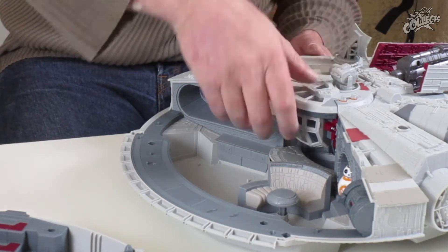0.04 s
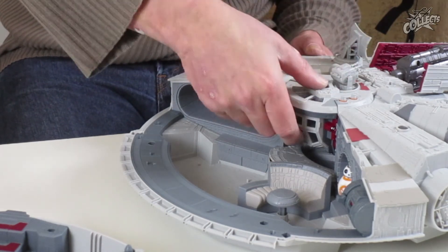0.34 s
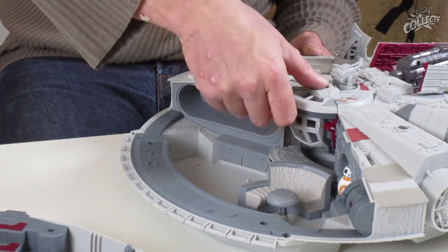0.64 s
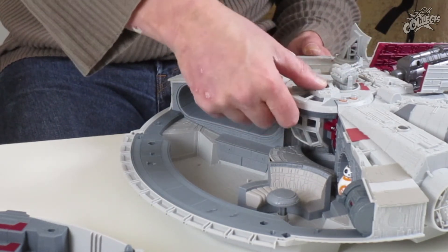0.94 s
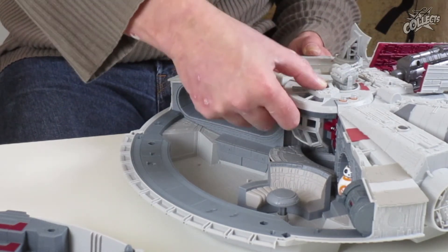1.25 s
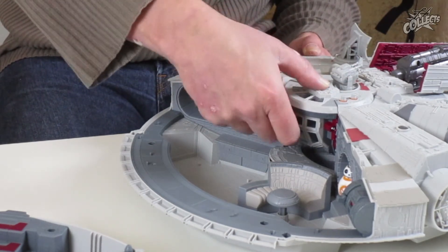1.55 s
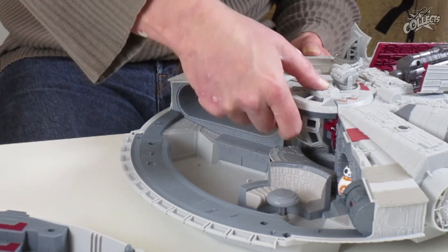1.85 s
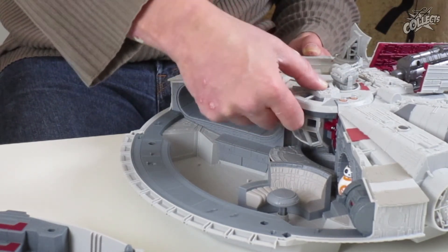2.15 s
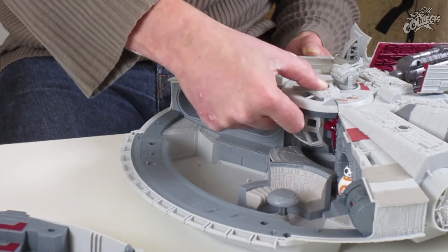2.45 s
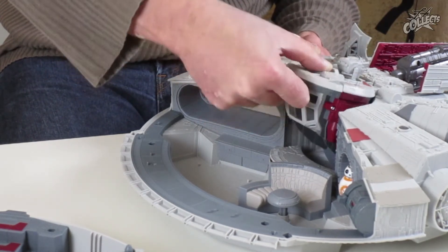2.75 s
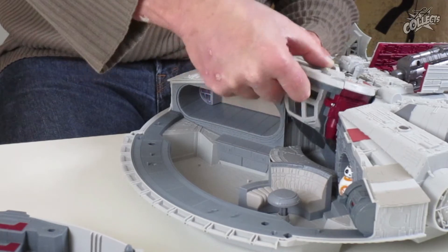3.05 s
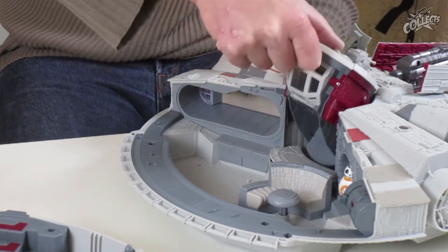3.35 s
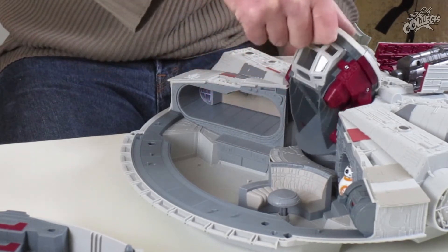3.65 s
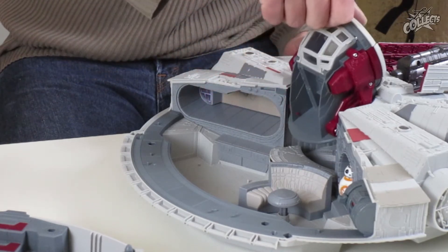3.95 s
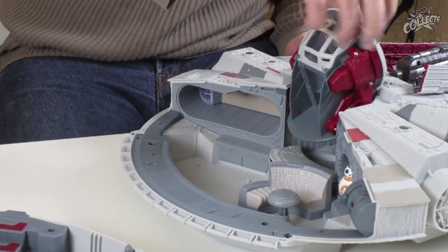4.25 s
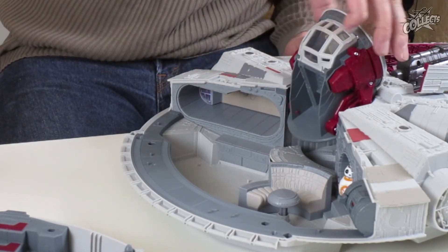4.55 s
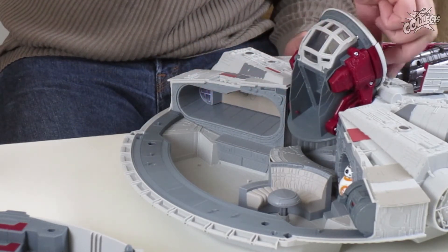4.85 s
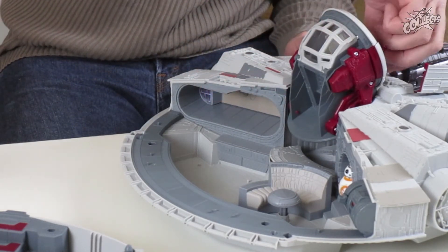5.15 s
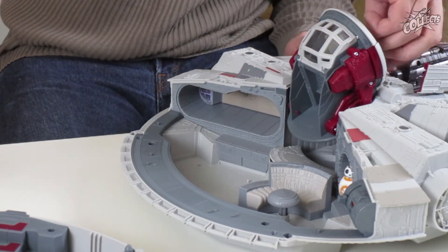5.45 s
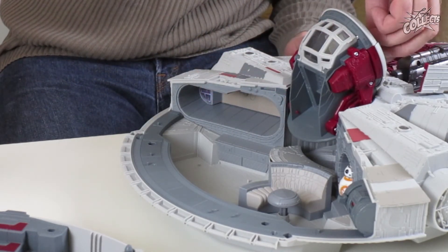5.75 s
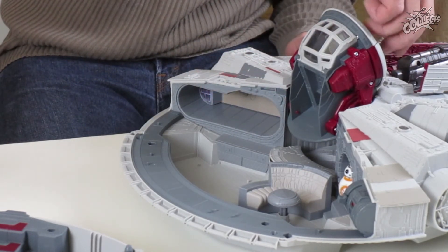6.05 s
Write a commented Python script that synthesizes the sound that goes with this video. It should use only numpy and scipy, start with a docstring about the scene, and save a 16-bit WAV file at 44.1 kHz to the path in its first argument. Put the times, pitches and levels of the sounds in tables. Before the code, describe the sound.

Fingers scuff and tap hollow plastic, then a switch snaps, a hatch knocks loose and small parts click into place.

```python
"""Handling a hollow plastic toy

A hand works a large hollow plastic toy on a table in a small, quiet room. Fingers rub and bump the
shell, a switch snaps, a hatch knocks free and swings up on a ticking hinge, and a small cannon clicks
into place. Blows chatter and ring the shell, panels give short tones, and rubs are showers of
tiny slips. A faint deep throb comes steadily about twice a second, over a low room rumble."""
import sys
import numpy as np
from scipy import signal
from scipy.fft import rfft, irfft
from scipy.io import wavfile
from scipy.ndimage import uniform_filter1d

SR = 44100
rng = np.random.default_rng(int(sys.argv[2]) if len(sys.argv) > 2 else 0)


def dump(signal):
    """Clip the signal to [-1, 1] and save it as 16-bit WAV at the path in sys.argv[1]."""
    limited = np.clip(np.atleast_2d(signal).T, -1, 1)
    pcm = np.round(limited * 32767).astype(np.int16)
    wavfile.write(sys.argv[1], SR, pcm)


N = 273463

# colour of the low room rumble: (f/Hz, level/dB)
RUMBLE_COLOUR = [(15, -1), (30, -3.5), (55, -9.5), (85, -6.5), (165, -13), (230, -23), (310, -28.5),
                 (500, -31.5), (900, -60)]
# colour of the faint hiss, filtered off above about 12 kHz: (f/Hz, level/dB)
HISS_COLOUR = [(100, -1.5), (400, 6.5), (700, 18), (1100, 11), (2000, 7), (4000, 1.5), (8000, -1.5),
               (11500, -3.5), (12800, -22.5), (16000, -24.5)]
# decay of the room's tail: (f/Hz, t60/s)
ROOM_T60 = [(100, 0.44), (300, 0.21), (1000, 0.18), (2000, 0.22), (5000, 0.11), (12000, 0.13)]
# early echoes off the table and near walls: (delay/s, level/dB)
ECHOES = [(.0032, -7.5), (.0085, -21), (0.0179, -8), (0.026, -14), (.033, -21)]
# short panel tones, alone or under knocks and snaps: (t/s, level/dB, f/Hz, rise/cycles)
PANEL_TONES = [(.108, -51.5, 576, 2.8), (.109, -50.5, 297, 1.22), (.402, -56, 600, 2.1),
               (.535, -57, 626, 5.5), (1.595, -59.5, 629, 6.4), (2.5198, -45, 725, 1.38),
               (2.653, -23.5, 526, 1.55), (2.897, -70, 810, 1.1), (3.127, -73, 752, 1.4),
               (3.243, -70, 802, 1.4), (3.872, -69.5, 861, 1.6), (4.238, -46.5, 255, 1.23),
               (4.24, -52, 550, 3.9), (4.2402, -47.5, 2210, 3.35), (4.838, -59.5, 938, 4.9),
               (5.126, -58.5, 833, 2.45), (5.211, -52.5, 900, 0.85), (5.215, -39.5, 1660, 1.2),
               (5.287, -52, 836, 2.5), (5.308, -58.5, 805, 2.4), (5.389, -60.5, 860, 1.13)]
# fingers and loose parts knocking on the shell:
# (t/s, level/dB, hardness/dB per octave, low cut/Hz, struck wall f/Hz, seating time/s)
KNOCKS = [(.111, -67, -6, 90, 1690, 0.007), (.17, -64.5, -4.5, 90, 950, .002),
          (.596, -49.5, -5, 330, 850, 0.00058), (.623, -49.5, -5, 180, 1770, 0.0015),
          (.657, -54, -6.5, 79.5, 340, 0.0014), (1.3641, -47.5, -3.5, 178, 750, 0.00082),
          (1.467, -58, -3.5, 70, 306, 0.00087), (1.525, -78, 3, 303, 656, .0007),
          (1.957, -47, 0, 330, 1530, 0.0004), (1.991, -52.5, -2.5, 199, 1580, 0.00061),
          (4.2254, -57, 3, 180, 550, 0.0036)]
# colour of one hard contact: (f/Hz, level/dB)
CONTACT_COLOUR = [(40, -32.5), (110, -9.5), (300, -8), (385, -14.5), (540, -1.5), (900, -11.5),
                  (1250, -12.5), (1700, -17), (2000, -26), (2400, -28), (3000, -35.5), (4700, -30),
                  (7000, -41), (8200, -50), (10500, -53), (16000, -77)]
# modes of the hollow shell: (f/Hz, level/dB, t60/s)
SHELL_MODES = [(95.8, -10.5, 0.744), (129.2, -3, 0.402), (139.46, -10, .3), (172, -13.5, 0.18),
               (209.7, -13, 0.37), (253.8, -9, 0.48), (324.2, 2.5, 0.15), (440, -7.5, 0.1433),
               (497.3, -5, 0.28), (526, -1, 0.31), (676, -5, 0.36), (760, 1.5, 0.13), (753, -15, 0.12),
               (856, -10.5, 0.2), (839, -19.5, 0.201), (1070, -4.5, 0.11), (1151.5, -20.5, 0.34),
               (1495, -22, .17), (1586, -12, 0.21), (1852, -29.5, 0.047), (2096, -17.5, 0.12),
               (2560, -18.5, 0.0515)]
# bands that shape a blow, from thud to sparkle: (low f/Hz, high f/Hz)
BLOW_BANDS = [(80, 300), (300, 1100), (1100, 2000), (2000, 3200), (3200, 8000), (8000, 15000)]
# peak balance of a blow of middling hardness: (level/dB for each band)
BLOW_BALANCE = [0.5, -2, -10.5, -21.5, -24, -38.5]
# small loose parts set ringing by the blows: (t/s, level/dB, f/Hz)
PINGS = [(.111, -58, 1720), (.112, -79.5, 4450), (.623, -84, 4360), (1.3641, -68, 4920),
         (1.89, -54.5, 6320), (1.8966, -67, 3950), (2.651, -60.5, 4362), (4.239, -60, 4530),
         (4.9176, -64.5, 4050), (4.938, -63.5, 4070), (5.2145, -61, 5170)]
# soft bumps of toy and table: (t/s, level/dB, f/Hz, swell and decay/s)
BUMPS = [(0.292, -47.5, 54.6, 0.046), (0.608, -46, 121.6, 0.017), (1.752, -38.5, 63.7, 0.035),
         (4.226, -44, 59, 0.021), (5.341, -44.5, 59.3, 0.019)]
# skin and plastic sliding on the shell: (peak t/s, level/dB, swell/s, release/s, panel drone/dB)
RUBS = [(.42, -76.5, .012, 0.042, 11), (.55, -61.5, 0.028, 0.022, -7), (.612, -50.5, 0.029, 0.042, -12),
        (.655, -56, 0.022, 0.0068, -4), (1.36, -51, .016, .016, -15), (1.527, -78.5, 0.0046, 0.081, 2),
        (1.61, -79.5, 0.024, .02, 14.5), (5.2, -70, 0.057, 0.094, -21)]
# colour of the sliding: (f/Hz, level/dB)
RUB_COLOUR = [(80, -34.5), (200, -9), (300, 3.5), (800, 5), (1150, -5), (1750, -14), (2500, -43),
              (3800, -50.5), (7000, -26.5), (13000, -62)]
# thin ribs that sing as the parts slide: (f/Hz, level/dB, t60/s)
RIB_MODES = [(1568, 14, 0.13), (1672, 16.5, 0.09), (2203, 2, 0.24), (4470, -2, 0.092), (5130, -4.5, 0.054),
             (6100, 2.5, 0.054), (6700, -1.5, 0.14), (7160, -4, 0.042), (10050, 0, 0.055),
             (12140, -8, 0.25)]
# the panel droning under the finger: (f/Hz, level/dB, t60/s)
PANEL_MODE = [(623, 0, 0.079)]
# catches snapping home: (t/s, level/dB, hardness/dB per octave, low cut/Hz, clean attack/dB,
# chatter/s, hand damping/s, struck wall f/Hz, wall swing level/dB, swing rise/cycles)
SNAPS = [(1.89, -59, 9, 2500, 10.5, 0.0066, .23, 1500, -42.5, 2),
         (1.8942, -33, -0.16, 129, -4, 0.0013, 0.12, 826, -29, 0.88),
         (2.6504, -28.5, 0.22, 159, -6.5, 0.0022, 0.19, 793, -15, 0.6),
         (4.239, -44, 3.5, 336, -3, 0.0027, 0.22, 1110, -42.5, 2.3),
         (4.9193, -40.5, -4, 60, -3, 0.0063, 0.11, 505, -43.5, 1.3),
         (4.937, -47, -1, 150, 12, .0059, 0.19, 205, -43.5, 0.93),
         (5.2147, -35.5, -3.5, 1650, 7, 0.0011, 0.15, 2480, -44.5, 1.3)]

AGE = np.arange(SR // 2) / SR  # seconds since a hit
CATCH_SEAT_S = .001  # time for a catch to seat


def amp(db):
    """Decibels to gain."""
    return 10 ** (np.asarray(db) / 20)


def unit(x):
    """Scales to an energy of one."""
    return x / np.sqrt(np.sum(x ** 2) + 1e-30)


def curve_at(points, hz):
    """Reads a curve on a log-frequency axis."""
    f, value = np.transpose(points)
    return np.interp(np.log(hz + 1), np.log(f), value)


def add(mix, s, sound):
    """Mixes a sound in at time s."""
    part = mix[max(round(s * SR), 0):][:len(sound)]
    part += sound[:len(part)]


def colour(x, points, size=4096):
    """Minimum-phase EQ along the given curve: nothing sounds ahead of the attack."""
    log_gain = np.log(amp(curve_at(points, abs(np.fft.fftfreq(size, 1 / SR)))))
    response = np.exp(np.conj(signal.hilbert(log_gain)))
    impulse = np.fft.ifft(response).real
    return signal.fftconvolve(x, impulse[:size // 2])[:len(x)]


def noise(points):
    """Steady noise of rms one with the given colour."""
    gain = amp(curve_at(points, np.fft.rfftfreq(N, 1 / SR)))
    return unit(irfft(rfft(rng.standard_normal(N)) * gain, N)) * np.sqrt(N)


def rumble_and_hiss(rumble_db=-65, hiss_db=-85):
    """A bed of low rumble and faint hiss, with the hiss filtered off above about 12 kHz."""
    return amp(rumble_db) * noise(RUMBLE_COLOUR) + amp(hiss_db) * noise(HISS_COLOUR)


def room_tail(build_s=.011):
    """Dense reflections that build up and die band by band."""
    hz, t, spectrum = signal.stft(rng.standard_normal(len(AGE)), SR, nperseg=256)
    decay = amp(-60 * t / curve_at(ROOM_T60, hz)[:, None])
    tail = signal.istft(spectrum * decay, SR, nperseg=256)[1][:len(AGE)]
    return unit(tail * (1 - np.exp(-AGE / build_s)))


def near_path(smear_s=.00024):
    """The direct sound and its first echoes, which come back duller."""
    path = signal.unit_impulse(len(AGE))
    dull = np.exp(-AGE / smear_s)
    for s, db in ECHOES:
        add(path, s, amp(db) * dull / dull.sum())
    return path


def panel_swing(db, hz, rise_cycles, wet_db):
    """One short panel mode swells and dies, with a touch of room."""
    rise = AGE * hz / rise_cycles
    mode = amp(db) * rise * np.exp(1 - rise) * np.sin(2 * np.pi * hz * AGE)
    return mode + amp(wet_db) * signal.fftconvolve(mode, room_tail())[:len(AGE)]


def panel_tones():
    """Light taps and ticks on their own, and extra ringing under some knocks and snaps."""
    out = np.zeros(N)
    for s, db, hz, rise_cycles in PANEL_TONES:
        add(out, s, panel_swing(db, hz, rise_cycles, wet_db=-13))
    return out


def ring(modes, detune=.012):
    """Dying sines of alternating polarity; each contact point detunes them a little."""
    hz, db, t60 = np.transpose(modes)[:, :, None]
    hz = hz * (1 + detune * rng.standard_normal(hz.shape))
    polarity = (-1) ** np.arange(len(hz))[:, None]
    return (polarity * amp(db - 60 * AGE / t60) * np.sin(2 * np.pi * hz * AGE)).sum(0)


def seating(seat_s):
    """Attack envelope: the force builds as the parts seat."""
    return 1 - np.exp(-AGE / seat_s)


def peak_db(x, band):
    """Level of the loudest three milliseconds within a band."""
    part = signal.sosfilt(signal.butter(4, band, "band", fs=SR, output="sos"), x)
    return 10 * np.log10(uniform_filter1d(part ** 2, 128).max() + 1e-30)


def voice_blow(hit, db, hardness, low_cut_hz):
    """Sets a blow's band peaks: a harder contact lifts the treble, a smaller part has no bass."""
    centres = np.sqrt(np.prod(BLOW_BANDS, axis=1))
    octaves_up = np.maximum(np.log2(centres / centres[1]), 0)
    bass_loss_db = 10 * np.log10(1 + (low_cut_hz / centres) ** 6)
    levels = db + np.array(BLOW_BALANCE) + hardness * octaves_up - bass_loss_db
    for _ in range(2):  # two passes, as the bands bleed into each other
        gains = [level - peak_db(hit, band) for level, band in zip(levels, BLOW_BANDS)]
        hit = colour(hit, list(zip(centres, gains)))
    return hit


def blow(db, hardness, low_cut_hz, wall_hz, seat_s, attack_db, chatter_s, damping_s, wall_db):
    """A blow chatters, rings the shell and stresses the struck wall's broad resonance."""
    chatter = unit(rng.standard_normal(len(AGE)) * np.exp(-AGE / chatter_s))
    contact = amp(attack_db) * near_path() + amp(-2) * chatter + amp(-5) * room_tail()
    shell = amp(-5) * unit(ring(SHELL_MODES))
    grip = np.exp(-AGE / damping_s)  # the hand soaks up the ring
    hit = seating(seat_s) * (unit(colour(contact, CONTACT_COLOUR)) + shell) * grip
    hit = voice_blow(hit, db, hardness, low_cut_hz)
    wall = signal.lfilter(*signal.iirpeak(wall_hz, Q=4, fs=SR), hit)
    return hit + (amp(wall_db) - 1) * wall


def knocks():
    """Light blows on the shell, quickly choked by the hand."""
    out = np.zeros(N)
    for s, db, hardness, low_cut_hz, wall_hz, seat_s in KNOCKS:
        add(out, s, blow(db, hardness, low_cut_hz, wall_hz, seat_s,
                         attack_db=1, chatter_s=.0021, damping_s=.056, wall_db=11))
    return out


def pings(t60_s=.0367, wet_db=-5, mellow_below_hz=3300):
    """Small loose parts ring briefly on three modes; larger ones keep to their lowest."""
    out = np.zeros(N)
    for s, db, hz in PINGS:
        mellow_db = -10 * np.log10(1 + (mellow_below_hz / hz) ** 8)
        modes = [(hz, 0, t60_s), (1.52 * hz, mellow_db - 3, t60_s), (1.64 * hz, mellow_db - 5, t60_s)]
        ping = seating(CATCH_SEAT_S) * ring(modes, detune=.004)
        room = near_path() + amp(wet_db) * room_tail()
        add(out, s, amp(db) * signal.fftconvolve(ping, room)[:len(AGE)])
    return out


def deep_tone(s, db, hz, rise_s, decay_s):
    """A deep tone that swells to a rounded peak at time s and fades."""
    t = np.arange(N) / SR - s
    envelope = np.exp(-np.where(t < 0, (t / rise_s) ** 2, np.hypot(t / decay_s, .5) - .5))
    return amp(db) * envelope * np.cos(2 * np.pi * (hz * t + rng.random()))


def table_bumps():
    """Toy and table bump softly under the hand."""
    return sum(deep_tone(s, db, hz, fade_s, fade_s) for s, db, hz, fade_s in BUMPS)


def throbs(first_s=.295, every_s=.555):
    """A faint deep throb at a steady pace."""
    beats = np.arange(first_s, N / SR, every_s)
    return sum(deep_tone(s, db=-54, hz=48.6, rise_s=.08, decay_s=.1) for s in beats)


def rubs(slips_per_s=400, size_spread_db=4, ribs_db=-13):
    """Tiny uneven slips excite the shell, its ribs and one panel as a stroke swells and lets go."""
    out = np.zeros(N)
    for s, db, swell_s, release_s, panel_db in RUBS:
        t = np.arange(-4 * swell_s, 4 * release_s, 1 / SR)
        pressure = amp(db) * np.exp(np.minimum(t / swell_s, -t / release_s))
        slipping = rng.random(len(t)) < slips_per_s / SR
        sizes = amp(size_spread_db * rng.standard_normal(len(t))) * rng.choice([-1, 1], len(t))
        friction = unit(slipping * sizes) * np.sqrt(len(t)) * pressure
        scuff = unit(colour(near_path() + amp(-2.5) * room_tail(), RUB_COLOUR))
        shell = unit(colour(ring(SHELL_MODES), RUB_COLOUR))
        ribs = amp(ribs_db) * unit(ring(RIB_MODES))
        panel = amp(panel_db) * unit(ring(PANEL_MODE))
        add(out, s + t[0], signal.fftconvolve(friction, unit(scuff + shell) + ribs + panel))
    return out


def catch_snaps():
    """A catch snaps home: a hard blow swings the wall behind it."""
    out = np.zeros(N)
    for s, db, hardness, low_cut_hz, attack_db, chatter_s, damping_s, wall_hz, swing_db, cycles in SNAPS:
        add(out, s, blow(db, hardness, low_cut_hz, wall_hz, CATCH_SEAT_S,
                         attack_db, chatter_s, damping_s, wall_db=.5))
        add(out, s, panel_swing(swing_db, wall_hz, cycles, wet_db=-11))
    return out


def scene():
    """The toy's handling sounds over a quiet bed, in mono."""
    bed = rumble_and_hiss() + throbs()
    return (bed + table_bumps() + catch_snaps() + knocks() + pings() + panel_tones() + rubs())[None]


def record(dry, cutoff_hz=15800):
    """A steep low-pass trims the very top."""
    low_pass = signal.firwin(511, cutoff_hz, window=("kaiser", 9), fs=SR)
    return signal.oaconvolve(dry, low_pass[None], "same")


dry = scene()
out = record(dry)
dump(out)
```